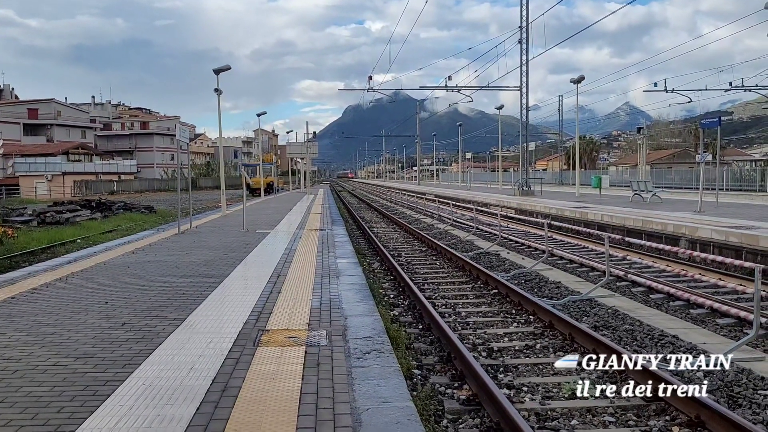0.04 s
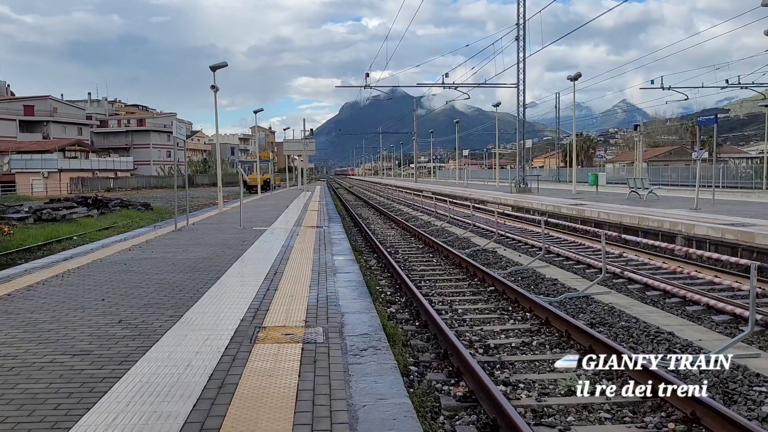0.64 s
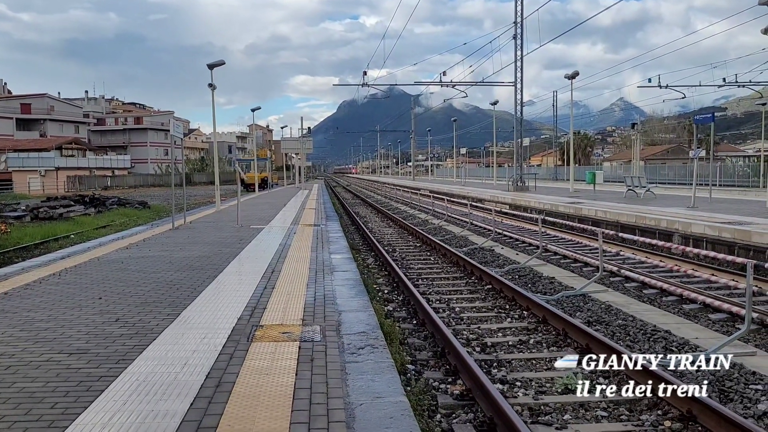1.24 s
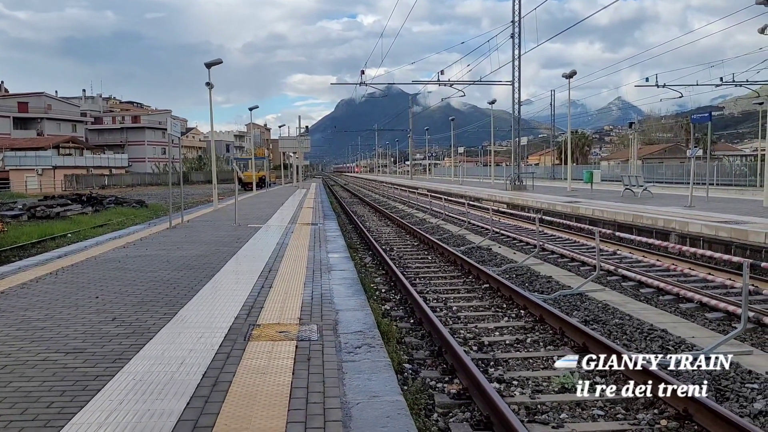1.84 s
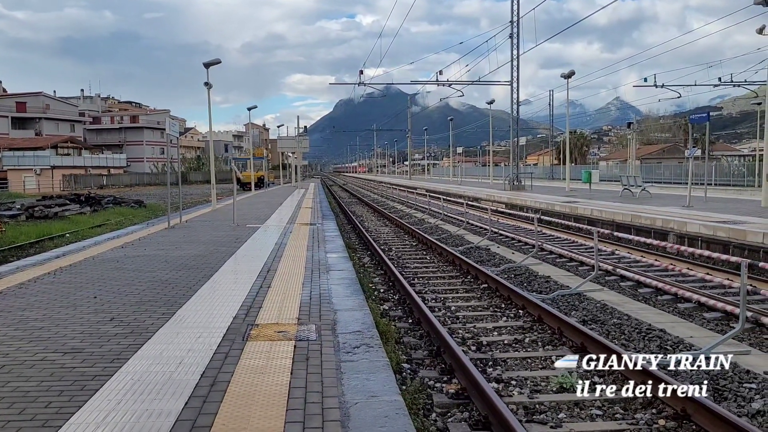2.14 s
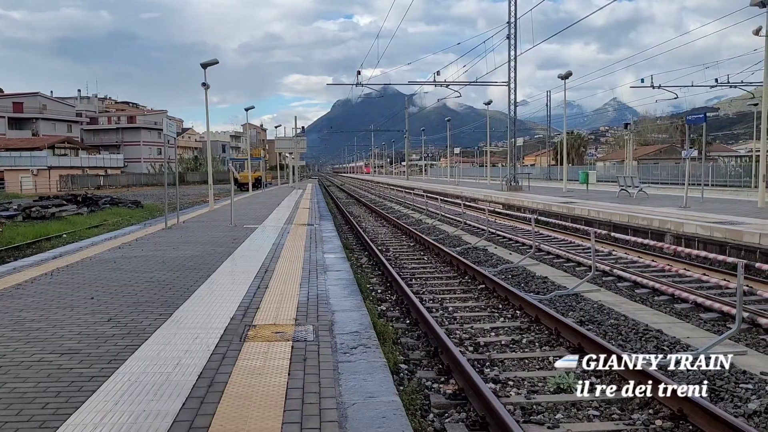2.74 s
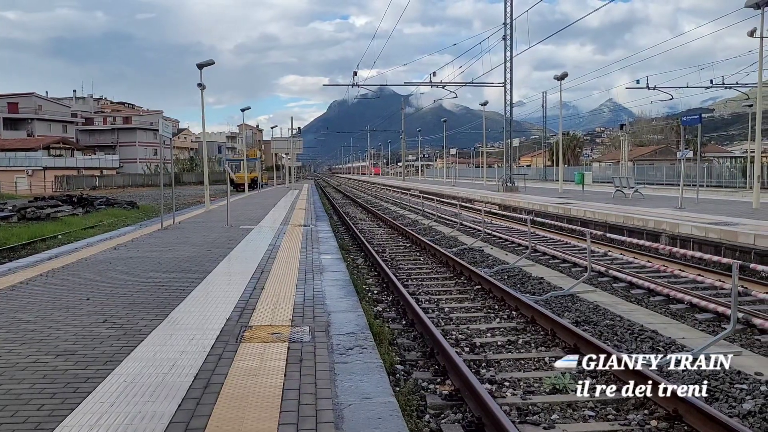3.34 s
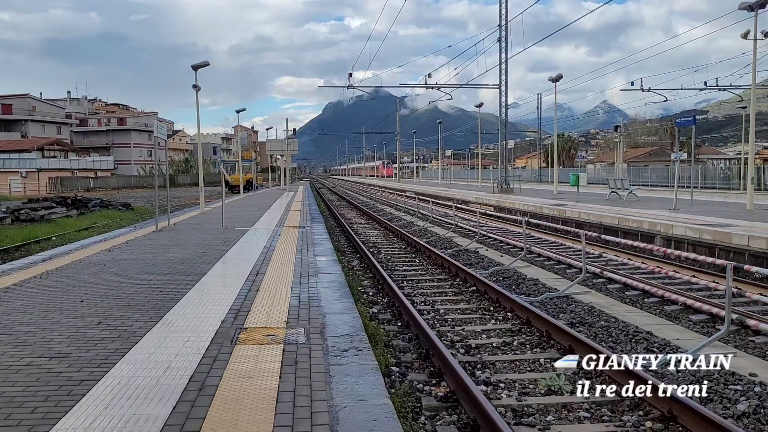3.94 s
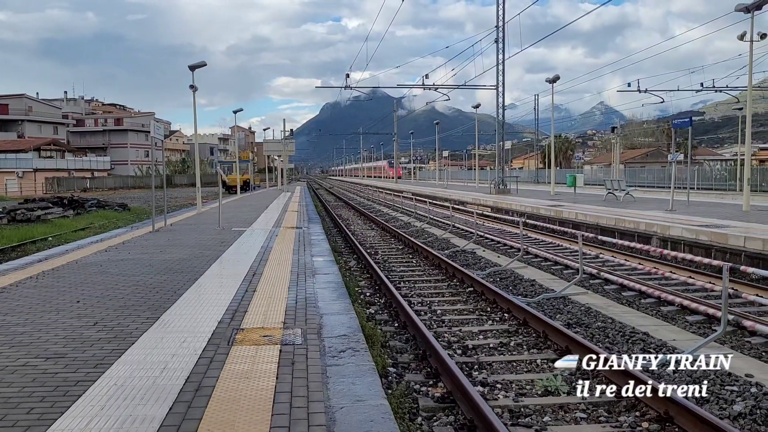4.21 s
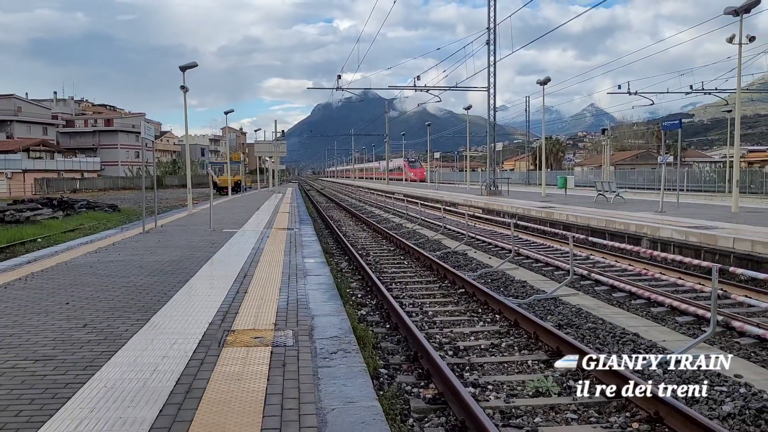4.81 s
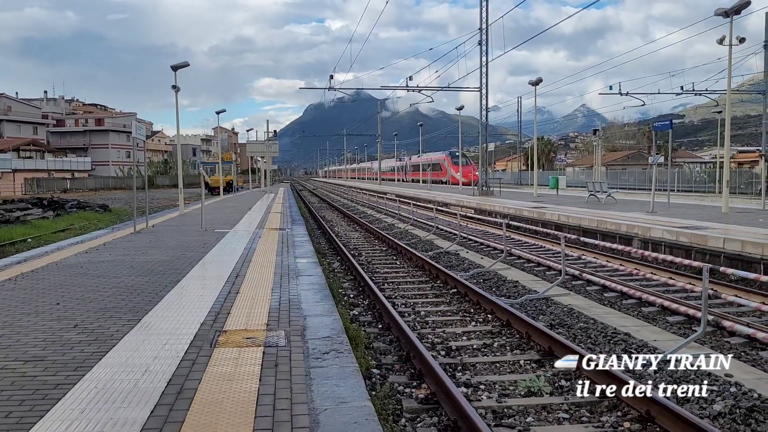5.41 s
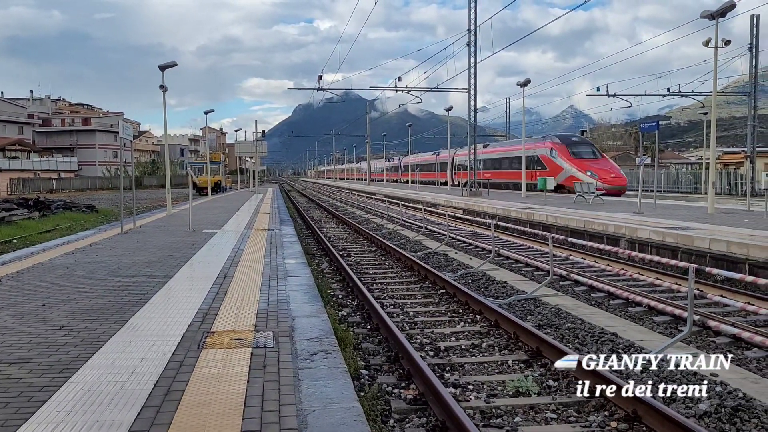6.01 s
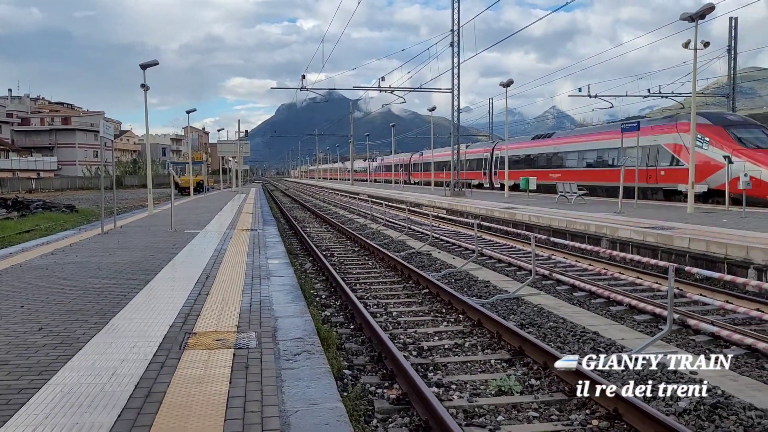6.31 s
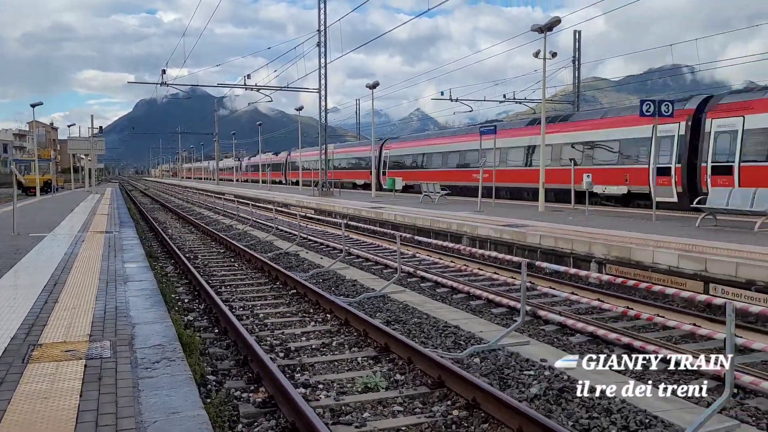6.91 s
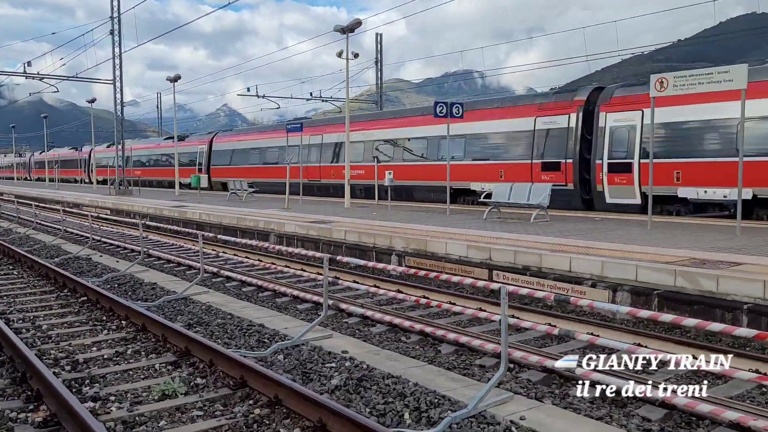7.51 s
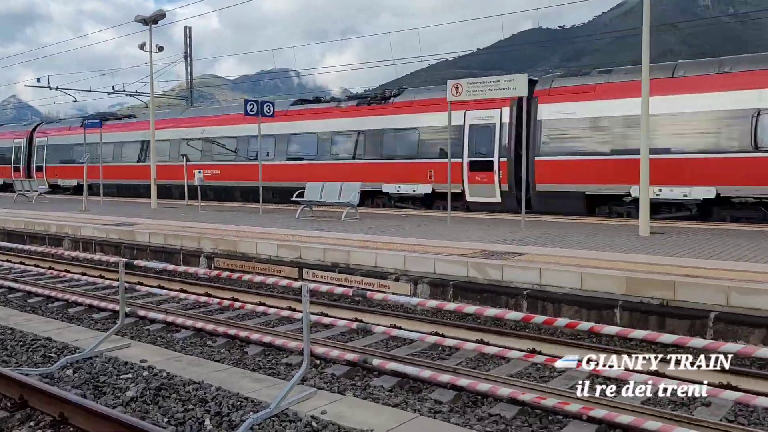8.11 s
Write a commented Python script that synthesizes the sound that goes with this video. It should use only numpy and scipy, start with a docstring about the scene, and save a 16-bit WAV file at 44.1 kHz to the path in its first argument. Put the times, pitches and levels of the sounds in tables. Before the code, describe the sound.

A low, distant rumble comes from an electric high-speed train approaching an open-air station. It sounds one short air-horn blast, which walls and hills return as a dull, lingering echo. Wheel, rail and air noise then swells and brightens, with a few distant clacks, until the train rushes by with dull axle knocks. A phone on the opposite platform hears it in stereo.

```python
"""High-speed train through a station

An electric train sounds one air-horn blast far down the line; walls and hills return it.
Wheel, rail and air noise swells as the bogies sweep by from ahead to the right, with distant
clacks, then dull axle knocks. A bird and a rasp are faint early on. A phone on the opposite
platform hears it all through two microphones."""
import sys
import numpy as np
from scipy import signal
from scipy.fft import rfft
from scipy.io import wavfile
from scipy.ndimage import uniform_filter1d, map_coordinates

SR = 44100
rng = np.random.default_rng(int(sys.argv[2]) if len(sys.argv) > 2 else 0)


def transcribe(u):
    """Save the signal u as a 16-bit wav file named by the first command-line argument.

    u: samples, shape (n,) or (channels, n), limited to [-1, 1]; the rate is SR.
    q: integer samples, one column per channel.
    """
    v = np.clip(np.atleast_2d(u).T, -1, 1)
    q = np.round(v * 32767).astype(np.int16)
    wavfile.write(sys.argv[1], SR, q)


N = 359415
TIME_S = np.arange(N) / SR
FRAME, HOP = 2048, 256
BIN_HZ = np.maximum(np.arange(FRAME // 2 + 1) * SR / FRAME, 1)
FRAME_S = np.arange(-(-N // HOP) + 1) * HOP / SR
SPEED_M_PER_S, CAR_M, TRACK_DISTANCE_M, NOSE_ABREAST_S = 66.5, 26.3, 11.97, 6.62
HORN_ON_S, HORN_OFF_S = 2.509, 3.57


# Diffuse station sound at the two mics: f/Hz, correlation
DIFFUSE_COHERENCE = [(100, 0.95), (290, .94), (440, 0.47), (600, 0.72), (760, 0.74), (1080, -0.65),
                     (1400, 0.28), (1700, -0.37), (2100, 0.48), (2550, 0.13), (3000, -0.44), (3600, 0.08),
                     (5000, 0.1), (8000, 0)]
# Mic balance: f/Hz, left minus right/dB
MIC_BALANCE = [(40, -5.5), (120, -0.2), (380, -1.5), (700, -1), (1290, 0.2), (2200, -1), (4400, 0),
               (8100, -1.5), (14000, 0)]


def rolling(direct_share=0.26, scatter_hz=5000, flutter_db=0.4, resonance_db=1.57):
    """Wheel, rail and air noise, part straight from the bogies, part from all round the station."""
    hz = BIN_HZ[:, None]
    direct = direct_share / (1 + (hz / scatter_hz) ** 2)
    diffuse = log_interp(DIFFUSE_COHERENCE, hz)
    coherence = 0.995 * (direct * bogie_coherence() + (1 - direct) * diffuse)
    right = noise_spectra()
    left = coherence * right + np.sqrt(1 - abs(coherence) ** 2) * noise_spectra()
    # rail and wheel resonances flare briefly, each on its own
    flare = uniform_filter1d(rng.standard_normal(right.shape), size=7, axis=0)
    flare = uniform_filter1d(flare, size=9, axis=1)
    flare_db = resonance_db * flare / flare.std() * np.clip(hz / 500, 0, 1)
    gain = rolling_gain() * undb(surges_db() + flare_db)
    pan = undb(log_interp(MIC_BALANCE, hz) / 2)
    spectra = np.array([left * pan, right / pan]) * gain
    roar = signal.istft(spectra * np.sqrt(3 / 4), nperseg=FRAME, noverlap=FRAME - HOP)[1][:, :N]
    return roar * undb(flutter_db * wander(28))


# Rolling spectra, train far, nearing and passing: f/Hz, relative level/dB
FAR_SPECTRUM = [(22, -6), (42, 0), (56, 2.5), (88, -23), (130, -13.5), (280, -11), (415, -32), (510, -23),
                (820, -21.5), (1050, -23.5), (1300, -20.5), (2200, -24.5), (3500, -51), (4550, -50.5),
                (5000, -51), (8500, -61.5), (15500, -71)]
NEARING_SPECTRUM = [(22, -18.5), (58, -1.5), (98, -7), (130, -7.5), (290, -9), (405, -19.5), (500, -14),
                    (680, -6.5), (1300, -13.5), (2100, -17.5), (2850, -24.5), (3600, -28), (5000, -29),
                    (8000, -44.5), (11000, -53.5), (15500, -72.5)]
PASSING_SPECTRUM = [(22, -20), (62, 5), (103, -11.5), (138, -2), (185, -2.5), (280, 1.5), (385, -12.5),
                    (640, -5.5), (1100, -6.5), (2150, -8.5), (2950, -20.5), (5500, -32.5), (7600, -31),
                    (8600, -38.5), (11500, -37), (15500, -45)]
# Edges of the bands for buffeting, car bodies, sleepers, rails, wheels, air hiss: f/Hz
BAND_EDGES_HZ = [25, 105, 400, 1100, 2800, 8000, 15500]


def rolling_gain(nearing_s=(1.4, 6.0), passing_s=(4.85, 6.6)):
    """Gain by frequency and time: the roar brightens and each band swells as the train nears."""
    nearing = np.interp(FRAME_S, nearing_s, [0, 1])
    passing = np.interp(FRAME_S, passing_s, [0, 1])
    hz, log_hz = BIN_HZ[:, None], np.log(BIN_HZ)
    far, mid, near = (log_interp(s, hz) for s in (FAR_SPECTRUM, NEARING_SPECTRUM, PASSING_SPECTRUM))
    gain = undb(far + nearing * (mid - far) + passing * (near - mid))
    edges = zip(BAND_EDGES_HZ, BAND_EDGES_HZ[1:])
    bands = np.array([(BIN_HZ >= lo) & (BIN_HZ < hi) for lo, hi in edges], float)
    final_power = gain[:, -1] ** 2
    log_centres = (bands * final_power) @ log_hz / (bands @ final_power)
    blend = np.transpose([np.interp(log_hz, log_centres, row) for row in np.eye(len(bands))])
    levels = band_levels()
    for _ in range(2):  # pull each band to its level, blending into its neighbours
        shortfall = levels / np.sqrt(bands @ gain ** 2)
        gain = gain * np.exp(blend @ np.log(shortfall))
    return gain


# Propagation, one row per band: base level of a bogie abreast/dB, drop/(dB per doubled distance),
# loss/(dB per 100 m), extra at nose/dB, background/dB
BAND_PROPAGATION = [(-40, 2, 5.5, 16, -51.5), (-28.5, 3, 5.5, 3, -70.5), (-25.5, 2, 7.5, -1, -65),
                    (-22.5, 4, 4.5, -2.1, -91), (-35, 2.5, 9.5, -0.76, -84), (-51, 1.5, 17.5, 4, -86.5)]


def band_levels(nose_decay_cars=1.54):
    """Bogie noise sums in power, weakened by spreading, air and ground; the nose adds turbulence."""
    range_m = np.hypot(bogies_ahead_m(), TRACK_DISTANCE_M)
    doublings = np.log2(range_m / TRACK_DISTANCE_M)
    extra_100m = (range_m - TRACK_DISTANCE_M) / 100
    nose = np.exp(-np.arange(len(range_m)) / nose_decay_cars)[:, None]
    levels = []
    for db, drop_db, loss_db, nose_db, background_db in BAND_PROPAGATION:
        per_bogie = undb(db - drop_db * doublings - loss_db * extra_100m + nose_db * nose)
        levels.append(np.sqrt((per_bogie ** 2).sum(0) + undb(background_db) ** 2))
    return np.array(levels)


def bogies_ahead_m(count=8):
    """Distance of each car end up the track, per frame, at constant speed."""
    return SPEED_M_PER_S * (NOSE_ABREAST_S - FRAME_S) + CAR_M * np.arange(count)[:, None]


# Phone heading: t/s, angle right of track/deg
PHONE_AIM = [(0, 4.5), (6.0, -0.5), (6.8, 53), (7.3, -5), (8.15, 62)]


def bogie_coherence(mic_lag_s=0.00057):
    """Each bogie's bearing sets its lag between the mics; the nearest dominates."""
    ahead_m = bogies_ahead_m()
    share = 1 / (ahead_m ** 2 + TRACK_DISTANCE_M ** 2)
    share = share / share.sum(0)
    aim_deg = np.interp(FRAME_S, *np.transpose(PHONE_AIM))
    bearing = np.arctan2(TRACK_DISTANCE_M, ahead_m) - np.radians(aim_deg)
    lags_s = mic_lag_s * np.sin(bearing)
    omega = 2 * np.pi * BIN_HZ[:, None]
    return sum(weight * np.exp(-1j * omega * lag_s) for weight, lag_s in zip(share, lags_s))


# Surges and lulls: t/s, half length/s, centre f/Hz, gain/dB
ROAR_SURGES = [(1.222, 0.057, 49.6, 9.5), (2.25, 0.51, 49, 3.5), (2.84, .3, 150, 4),
               (3.596, 0.53, 54.85, -4.5), (4.103, 0.68, 1000, -2), (5.42, 0.28, 65, 2.5),
               (6.15, .1, 11000, 2.5), (6.4, 0.39, 60.4, 1.5), (6.634, 0.061, 150, 0),
               (6.917, 0.023, 65, 3), (6.867, 0.14, 250, 1.5), (7.173, 0.073, 220, 4), (7.384, .1, 220, -4),
               (7.608, .05, 70, 6.5), (7.74, 0.045, 250, 5), (7.86, 0.068, 400, -5.5),
               (6.62, 0.057, 2510, 2.5), (7.09, 0.078, 1600, 1.5), (6.876, 0.032, 1500, 2.5),
               (7.913, 0.015, 2100, 3), (8.064, 0.055, 1710, 3)]


def surges_db(width_octaves=0.96):
    """Regions of the roar swell and dip as gusts and bogies go by."""
    at_s, half_s, hz, db = np.transpose(ROAR_SURGES)
    region = np.exp(-(np.log2(BIN_HZ[:, None] / hz) / width_octaves) ** 2)
    swell = np.exp(-((FRAME_S[:, None] - at_s) / half_s) ** 2)
    return (db * region) @ swell.T


# Axle strikes: t/s, relative level/dB, ring f/Hz, thud re ring/dB
AXLE_STRIKES = [(6.313, -10, 760, -10), (6.584, -9, 673, -1), (6.643, -6.5, 635, -2),
                (7.019, -7.5, 595, -1.5), (7.164, -3.5, 633, -16), (7.485, -9.5, 693, 0),
                (7.543, -5, 616, -4), (7.626, -5.5, 666, -13), (7.684, -3, 572, -7), (8.002, -9, 640, -9),
                (8.06, -1, 607, -12)]


def axle_knocks(ring_s=0.0053, thud_hz=255, thud_s=0.0074, rattle_db=-16, rattle_s=0.012, gain_db=-3):
    """Axles strike uneven rail: a short ring, a bogie thud and a rattle."""
    right = np.zeros(N + SR)
    t = TIME_S[:SR // 4]
    for at_s, db, hz, thud_db in AXLE_STRIKES:
        ring = np.sin(2 * np.pi * hz * t) * np.exp(-t / ring_s)
        thud = undb(thud_db) * np.sin(2 * np.pi * thud_hz * t) * np.exp(-t / thud_s)
        rattle = bandpass(rng.standard_normal(len(t)), 0.94 * hz, 0.97 * hz)
        rattle = undb(rattle_db) * rattle / rattle.std() * np.exp(-t / rattle_s)
        right[int(at_s * SR):][:len(t)] += undb(db + gain_db) * (ring + thud + rattle)
    right = right[:N]
    left = map_coordinates(right, [np.arange(N) - 51e-6 * SR], order=3)  # 51 microseconds later
    return np.array([left, right])


# Horn pitch: t/s, f/Hz
HORN_GLIDE = [(2.51, 467), (2.54, 447.7), (2.58, 441), (2.66, 441), (2.85, 439.4), (3.1, 441.2),
              (3.45, 441.2), (3.65, 444.8)]
# Upper partials: f/Hz, level/dB re brassy middle (partials 4-6) or sharp edge (7 up)
HORN_TREBLE = [(1770, -1), (2210, -3.5), (2650, -13), (3100, -4), (3550, -4.5), (4000, -15), (4450, -10.5),
               (5300, -14), (6600, -24.5), (7500, -34.5)]


def horn(attack_s=0.024, bloom_s=0.0043, release_s=0.094, wobble_hz=1.6, flutter_hz=13, partials=17):
    """An air horn sags in pitch as it speaks; upper partials bloom after the lower ones."""
    on = (TIME_S > HORN_ON_S) & (TIME_S < HORN_OFF_S)
    t = TIME_S[on]
    pitch_hz = np.interp(t, *np.transpose(HORN_GLIDE)) + wobble_hz * wander(40)[on]
    phase = 2 * np.pi * np.cumsum(pitch_hz) / SR
    *low_db, brass_db, edge_db = horn_envelopes_db(t)
    release = np.clip((HORN_OFF_S - t) / release_s, 0, 1)
    blast = np.zeros((2, N))
    for k in range(1, partials + 1):
        if k <= len(low_db):
            db = low_db[k - 1]
        else:
            db = (edge_db if k > 6 else brass_db) + log_interp(HORN_TREBLE, k * pitch_hz[-1])
        attack = np.clip((t - HORN_ON_S) / (attack_s + bloom_s * (k - 1)), 0, 1)
        # scattered paths take over: short waves flutter most, differently at each mic
        scatter = 0.32 * np.sqrt(k) * np.interp(t, [2.55, 2.95], [0.4, 1.5])
        paths = wander(flutter_hz * np.sqrt(k))[:4 * len(t)].reshape(2, 2, -1)
        fading = (1 + scatter * (paths[0] + 1j * paths[1])) / np.sqrt(1 + 2 * scatter ** 2)
        partial = np.exp(1j * (k * phase + rng.uniform(0, 2 * np.pi))) * fading
        blast[:, on] += np.sqrt(2) * undb(db) * attack * release * partial.imag
    return blast


# Fundamental, octave, twelfth, brassy middle, sharp edge:
# blast level/dB, rise/s, hold/s, lingering level/dB, its fade/(dB/s)
HORN_ENVELOPES = [(-26.5, .014, 0.12, -30.5, 5.5), (-21, 0.086, .33, -25, 19.5),
                  (-25, 0.041, 0.1, -40, 1.5), (-33, .02, 0.24, -44.5, 6), (-48, .02, 0.16, -52.5, 22)]


def horn_envelopes_db(t, drop_db_per_s=99, linger_from_s=2.74, swell_s=0.15):
    """The blast rises, holds and drops; sound lingering along the platforms swells and fades."""
    age_s, linger_s = t - HORN_ON_S, t - linger_from_s
    levels_db = []
    for blast_db, rise_s, hold_s, linger_db, fade_db_per_s in HORN_ENVELOPES:
        rise = np.sqrt(np.clip(age_s / rise_s, 0, 1))
        blast = rise * undb(blast_db - drop_db_per_s * np.maximum(age_s - hold_s, 0))
        linger = undb(linger_db - fade_db_per_s * linger_s) * np.clip(linger_s / swell_s, 0, 1)
        levels_db.append(20 * np.log10(np.hypot(blast, linger)))
    return levels_db


# Reflectors: delay/s, pitch ratio, gain/dB, top f/Hz, decay/s
REFLECTORS = [(.06, 0.94, -10.5, 5020, 1.1), (.06, .8, -9.5, 407, 2.2), (.06, 0.7, -24, 3500, .5),
              (.88, 0.97, -12, 584, 2.7)]


def wall_echoes(horn_mono, swell_s=0.2, smear=0.3):
    """Walls and hills return the horn duller, and lower where they see the train come at a slant."""
    out = np.zeros((2, N))
    for delay_s, ratio, db, top_hz, decay_s in REFLECTORS:
        age_s = np.maximum(TIME_S - HORN_ON_S - delay_s, 0)
        # many slants blur the lowered pitch
        slip_s = (1 - ratio) * np.cumsum((1 + smear * wander(60)) * (age_s > 0)) / SR
        echo = np.interp(HORN_ON_S + age_s - slip_s, TIME_S, horn_mono)
        envelope = np.clip(age_s / swell_s, 0, 1) * np.exp(-age_s / decay_s)
        echo = bandpass(echo * envelope, 100, top_hz, order=3)
        out += undb(db) * np.array([echo, np.roll(echo, rng.integers(-12, 12))])
    return out


def town_reverb(horn_mono, peak_gain_db=-8, t60_s=4.7, swell_s=0.2, band_hz=(200, 600)):
    """The town lets the horn ring on in a dull, diffuse tail."""
    t = TIME_S[:N // 3]
    envelope = undb(-60 * t / t60_s) * np.clip(t / swell_s, 0, 1)
    response = bandpass(rng.standard_normal((2, len(t))), *band_hz, order=1) * envelope
    response /= abs(rfft(response)).max()
    return undb(peak_gain_db) * signal.fftconvolve(horn_mono[None], response, axes=1)[:, :N]


# Distant wheel strikes: t/s, level/dB, centre f/Hz, band edge/centre
WHEEL_STRIKES = [(1.515, -43.5, 1170, 1.87), (5.195, -25, 755, 1.33), (5.425, -27, 614, 1.1),
                 (5.795, -22, 875, 1.07), (5.89, -25.5, 848, 1.1)]


def distant_clacks(rise_s=0.013, decay_s=0.053):
    """Wheels strike rough spots up the line; distance smears each clack."""
    out = np.zeros(N)
    t = TIME_S[:SR // 4]
    envelope = np.clip(t / rise_s, 0, 1) * np.exp(-t / decay_s)
    for at_s, db, hz, spread in WHEEL_STRIKES:
        burst = bandpass(rng.standard_normal(len(t)), hz / spread, hz * spread, order=6)
        out[int(at_s * SR):][:len(t)] += undb(db) * burst / burst.std() * envelope
    return out


# Chirps: t/s, level/dB
BIRD_CHIRPS = [(.628, -78), (1.238, -85)]


def bird(start_hz=7600, end_hz=6700, length_s=0.024):
    """A small, far bird gives thin falling chirps."""
    out = np.zeros(N)
    for at_s, db in BIRD_CHIRPS:
        progress = np.clip((TIME_S - at_s) / length_s, 0, 1)
        pitch_hz = start_hz + (end_hz - start_hz) * progress ** 2
        out += undb(db) * np.sin(np.pi * progress) * np.sin(2 * np.pi * np.cumsum(pitch_hz) / SR)
    return out


def rasp(at_s=0.615, length_s=0.27, attack_s=0.018, centre_hz=3150, spread=1.04, level_db=-76):
    """A faint, far rasp of narrow-band noise starts quickly and dies away."""
    age_s = TIME_S - at_s
    grain = bandpass(rng.standard_normal((2, N)), centre_hz / spread, centre_hz * spread)
    envelope = np.clip(age_s / attack_s, 0, 1) * np.sqrt(np.clip(1 - age_s / length_s, 0, 1))
    return undb(level_db) * grain / grain.std() * envelope


def undb(db):
    """Decibels to gain."""
    return 10 ** (np.asarray(db) / 20)


def log_interp(points, hz):
    """Points joined on a log-frequency axis."""
    point_hz, values = np.transpose(points)
    return np.interp(np.log(hz), np.log(point_hz), values)


def wander(rate_hz):
    """Smooth random drift, unit deviation."""
    step = int(SR / rate_hz)
    held = np.repeat(rng.standard_normal(N // step + 2), step)
    slewed = uniform_filter1d(held, step)[:N]
    return slewed / slewed.std()


def noise_spectra():
    """White noise as short-time spectra, unit mean power per bin."""
    spectra = signal.stft(rng.standard_normal(N), nperseg=FRAME, noverlap=FRAME - HOP)[2]
    return spectra / np.sqrt(np.mean(abs(spectra) ** 2))


def bandpass(x, lo_hz, hi_hz, order=2):
    """Flat-topped band-pass."""
    return signal.sosfilt(signal.butter(order, [lo_hz, hi_hz], "band", fs=SR, output="sos"), x)


def scene():
    """The train, its horn with echoes, a bird and a rasp, in stereo."""
    blast = horn()
    horn_mono = blast.mean(0)
    train = rolling() + axle_knocks() + distant_clacks()
    echoes = wall_echoes(horn_mono) + town_reverb(horn_mono)
    return train + blast + echoes + bird() + rasp()


def record(dry, low_cut_hz=34, top_hz=15700, hiss_db=-85):
    """The phone adds faint hiss and cuts the deepest bass and the top."""
    noisy = dry + undb(hiss_db) * rng.standard_normal((2, N))
    bass_cut = signal.sosfilt(signal.butter(6, low_cut_hz, "high", fs=SR, output="sos"), noisy)
    return signal.sosfilt(signal.ellip(10, 0.2, 80, top_hz, fs=SR, output="sos"), bass_cut)


dry = scene()
out = record(dry)
transcribe(out)
```